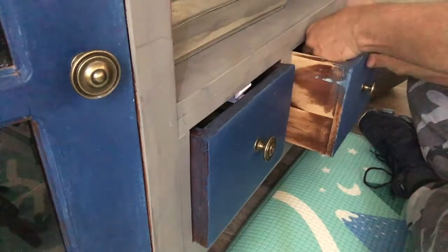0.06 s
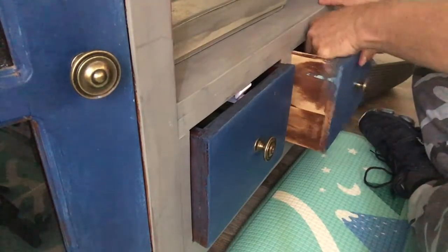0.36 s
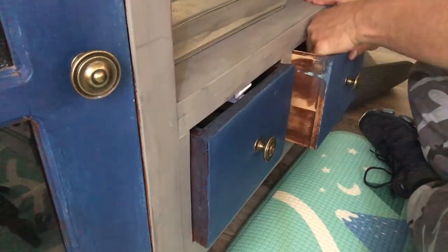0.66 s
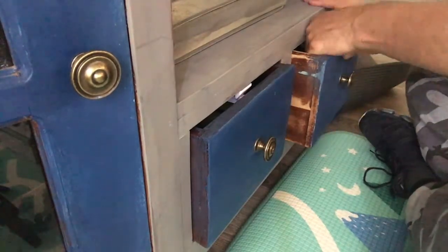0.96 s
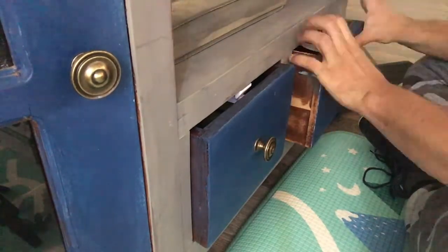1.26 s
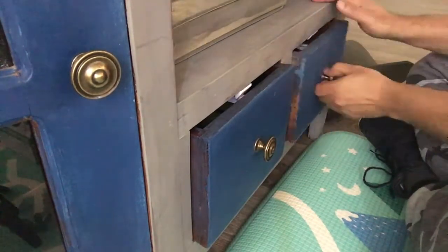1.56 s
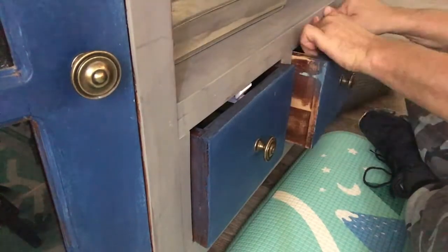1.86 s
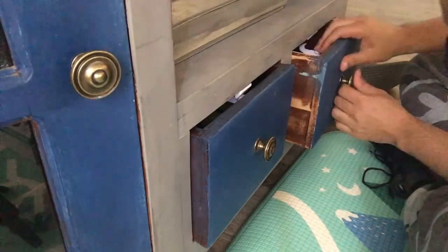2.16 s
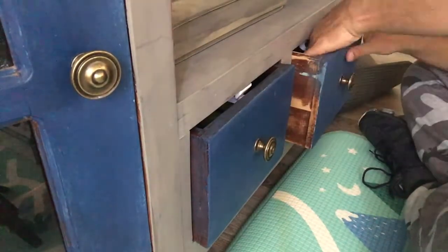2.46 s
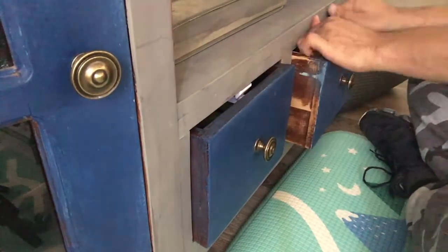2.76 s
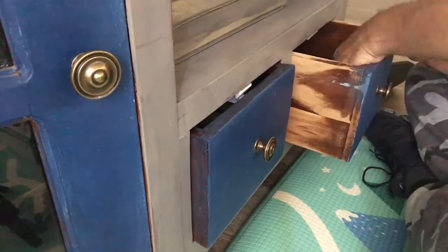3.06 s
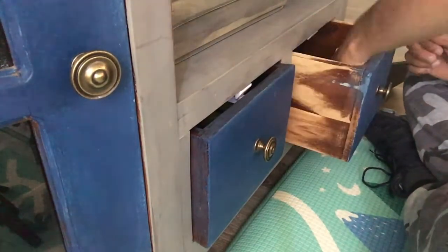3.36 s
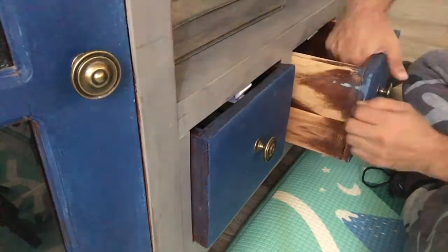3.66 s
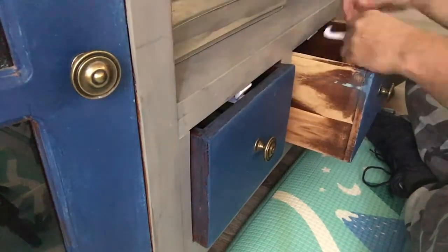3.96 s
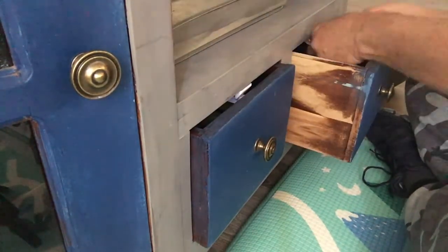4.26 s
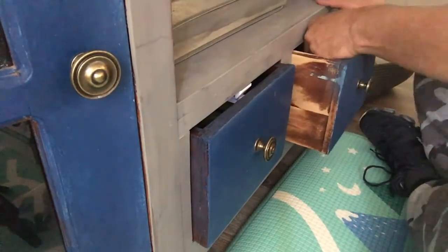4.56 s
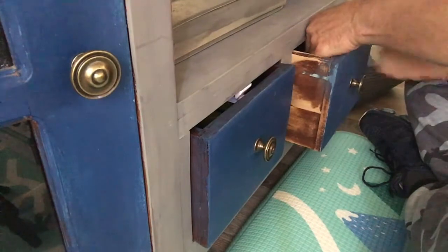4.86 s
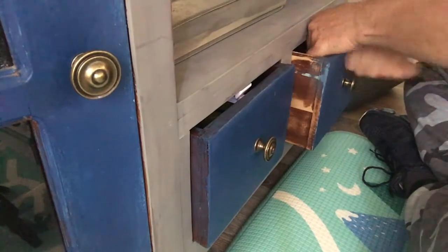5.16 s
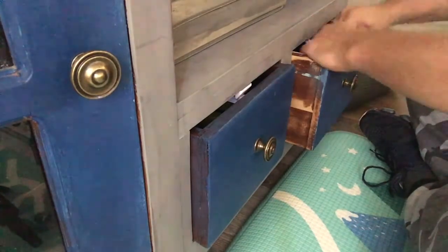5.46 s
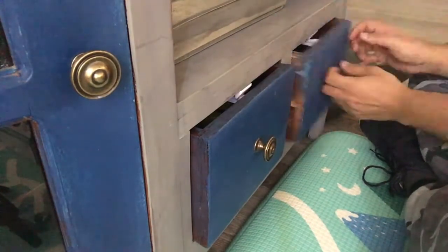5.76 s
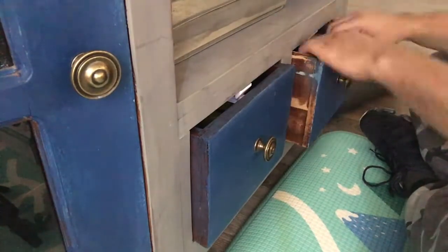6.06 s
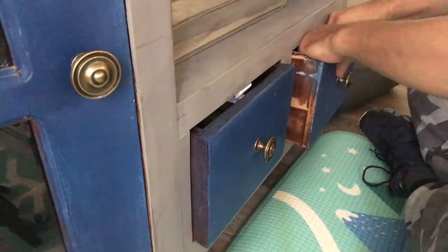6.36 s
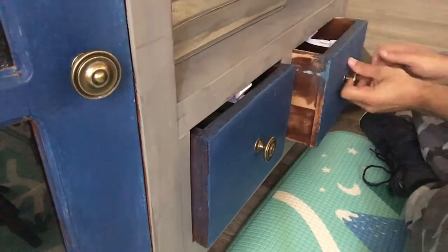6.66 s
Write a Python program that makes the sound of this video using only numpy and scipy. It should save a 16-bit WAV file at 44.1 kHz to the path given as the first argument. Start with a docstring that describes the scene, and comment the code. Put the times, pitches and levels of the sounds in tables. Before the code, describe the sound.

A small wooden drawer is worked by hand, close to the microphone in a quiet room. Sharp, uneven knocks against the cabinet fill the first second, with a soft hollow bump near 0.3 seconds. The loudest clack comes at 1.4 seconds, followed by more knocks until 1.9. A loose brass knob ticks lightly around 2.2 seconds, then a finger gives a tiny squeak and a nail hisses over the paint at 2.5. The drawer rattles briefly on its steel runner at 2.9, followed by soft finger taps and strong knocks at 3.5, 3.8 and 4.4. From 4.6 to 5.2 seconds it slides with a fast, ratcheting rattle, longest at the end. More knocks come between 5.6 and 6 seconds, then light finger rubs and a last knock at 6.7. A faint room hum and thin electrical buzz continue throughout.

```python
"""In a quiet room, a small wooden drawer is pulled out, rocked and pushed home by hand.
The box knocks in its cabinet, shaking its wooden panels, and rattles as its steel runner is dragged
over a row of catches. Fingers rub, tap and squeak on the paint, nails skate over it with a hiss, and
the loose brass knob ticks on its screw. Behind it are a faint room hum and a thin electrical buzz."""
import sys
import numpy as np
from scipy import signal
from scipy.fft import rfft, irfft, next_fast_len
from scipy.io import wavfile

SR = 44100
rng = np.random.default_rng(int(sys.argv[2]) if len(sys.argv) > 2 else 0)


def waveform_to_disk(signal):
    """Save audio, clipped to [-1, 1], as 16-bit WAV at the path in sys.argv[1]."""
    frames = np.transpose(np.atleast_2d(signal))
    scaled = np.clip(frames, -1, 1) * 32767
    samples = np.round(scaled).astype(np.int16)
    wavfile.write(sys.argv[1], SR, samples)


N = 299880
EVENT_TIME = np.arange(8192) / SR  # seconds since the start of one short sound

# the loose knob ticks on its screw: (time [s], level [dB])
KNOB_TICKS = [(.189, -54), (1.096, -56), (2.193, -47), (2.2173, -46.5), (2.2532, -44.5), (2.287, -53.5),
              (2.475, -54.5), (3.102, -52), (3.268, -52)]
# the knob's ringing notes: (pitch [Hz], level [dB], time to fade by 60 dB [s])
KNOB_NOTES = [(2552, -1, 0.0396), (3806, -13.5, 0.034), (4244, -6.5, 0.033), (4686, 5, 0.0315),
              (5140, -39, 0.02), (10760, -12, .01), (13350, -7, .009)]
# a fingernail skates over the paint: (time [s], length [s], level [dB])
NAIL_SKATES = [(0.215, 0.01013, -41.5), (2.547, 0.084, -50.5), (3.237, 0.088, -66), (3.395, 0.088, -58)]
# fingers slide over the wood: (time [s], length [s], level [dB])
FINGER_RUBS = [(0.465, 0.043, -55.5), (1.729, 0.182, -56), (1.897, 0.065, -57), (2.107, 0.083, -54),
               (2.719, 0.1, -57), (3.615, 0.0816, -53), (5.378, 0.025, -56), (5.51, 0.0667, -51.5),
               (5.981, 0.0637, -50), (6.038, 0.0446, -48.5), (6.115, 0.0386, -53.5), (6.234, 0.051, -61.5),
               (6.535, 0.0382, -49)]


def amp(db):
    """Turns decibels into a number to multiply a sound by."""
    return 10 ** (np.asarray(db) / 20)


def evened(x):
    """Scales a sound so that its average strength (rms) is 1."""
    return x / np.sqrt(np.mean(x ** 2) + 1e-20)


def struck(x):
    """Scales a blow so that its first 12 ms have an average strength of 1."""
    return x / np.sqrt(np.mean(x[:530] ** 2) + 1e-20)


def read(points, hz):
    """Reads between (frequency [Hz], value) points, treating every octave as equally wide."""
    point_hz, value = np.transpose(points)
    return np.interp(np.log(hz + 1), np.log(point_hz + 1), value)


def curve(points):
    """Turns (frequency [Hz], level [dB]) points into a gain for every frequency."""
    return lambda hz: amp(read(points, hz))


def colour(x, gain):
    """Turns each frequency in a sound up or down by gain(hz)."""
    size = next_fast_len(x.shape[-1] + 1024)
    return irfft(rfft(x, size) * gain(np.fft.rfftfreq(size, 1 / SR)), size)[..., :x.shape[-1]]


def bands(x, centres):
    """Splits a sound into overlapping frequency bands that add back up to it."""
    return [colour(x, lambda hz: read(np.c_[centres, pick], hz)) for pick in np.eye(len(centres))]


def add(mix, start_s, sound):
    """Mixes a sound in at the given time."""
    part = mix[max(round(start_s * SR), 0):][:len(sound)]
    part += sound[:len(part)]


def room_hum():
    """Still air hisses under a few softly wavering tones and a drifting whine."""
    # the hiss of the air: (frequency [Hz], relative level [dB])
    air_colour = [(60, -29), (170, 4.5), (280, -2), (420, 1.5), (620, 0.5), (950, 0), (1250, -6),
                  (2600, -2.5), (4300, -7), (7000, -11), (11000, -15), (16000, -16.5)]
    # the tones of the hum: (multiple of its pitch, level [dB])
    overtones = [(1, -75), (2, -76.5), (8, -86), (10, -78.5)]
    # the path of the whine: (time [s], pitch [Hz], level [dB])
    whine_path = [(0, 470, -63), (0.62, 468, -68), (1.548, 542, -67.5), (2.3, 500, -101), (3.1, 476, -68.5),
                  (3.6, 476, -67), (4.2, 485, -80.5), (5.401, 491, -68.5), (6.8, 462, -70)]
    air_db, hum_hz, thin_tone_hz, thin_tone_db = -64, 395.7, 2426, -73
    t = np.arange(N) / SR
    out = amp(air_db) * evened(colour(rng.standard_normal(N), curve(air_colour)))
    times, pitch, level = np.transpose(whine_path)
    whine = (np.interp(t, times, pitch), np.interp(t, times, level))
    hum = [(multiple * hum_hz, db) for multiple, db in overtones]
    for hz, db in hum + [(thin_tone_hz, thin_tone_db), whine]:
        drift = evened(colour(rng.standard_normal(N), lambda f: np.exp(-f / 8)))  # slow wobble
        phase = 2 * np.pi * np.cumsum(hz * (1 + .003 * drift)) / SR
        out += amp(db) * evened(np.sin(phase))
    return out


def electrical_buzz(rate_hz=240.15, level_db=-68, puff_db=-2):
    """Four slightly unsteady ticks in each cycle of the mains power, each with a puff of hiss."""
    turns = np.arange(N) / SR * rate_hz
    starts = np.arange(int(turns[-1])) / rate_hz
    late_s = rng.uniform(0, .0004, len(starts))
    ticks = np.bincount(np.round((starts + late_s) * SR).astype(int), minlength=N)[:N]
    puffs = rng.standard_normal(N) * np.exp(-(turns % 1) / .15)
    # only a thin fizz is heard: (frequency [Hz], relative level [dB])
    fizz = [(1000, -57), (4300, -25), (5000, 3), (5700, 2),
            (7000, -5), (8200, -1), (9500, -1), (10500, -25)]
    buzz = evened(ticks) + amp(puff_db) * evened(puffs)
    return amp(level_db) * evened(colour(buzz, curve(fizz)))


def ring(notes, detune_share=0.01162):
    """A struck object rings with fading notes; each point of contact favours them differently."""
    hz, db, fade_s = np.transpose(notes)[:, :, None]
    luck = rng.standard_normal((len(notes), 2, 1))
    favour_db, detune = 3.5 * luck[:, 0], 1 + detune_share * luck[:, 1]
    sign = (-1) ** np.arange(len(notes))[:, None]  # every other note swings the opposite way first
    fade = amp(db + favour_db - 60 * EVENT_TIME / fade_s)
    return (sign * fade * np.sin(2 * np.pi * hz * detune * EVENT_TIME)).sum(0)


def box_shakes(count, alike_share=0.281, cabinet_db=-17, cabinet_fade_s=0.0793, crack_db=15):
    """One short, noisy shudder of the box per blow, taking partly the same path through the wood."""
    # how the wood shakes: (frequency [Hz], level [dB], time to fade by 60 dB [s], rise time [s])
    wood_bands = [(294.4, -26, 0.06, 0.0055), (435.2, -5, 0.098, 0.00086), (950, 1, 0.0621, 0.000534),
                  (1500, 3.5, 0.0447, 0.00071), (2610, 8.5, 0.01903, 0.001774),
                  (4020, 1.5, 0.0352, 0.00048), (4539, 6.5, 0.0232, 0.000234),
                  (6027, -17.5, 0.0638, 0.000079), (9910, -5, 0.0231, 0.000357),
                  (16240, -5, 0.01262, 0.0000286)]
    same_path = np.sqrt(alike_share) * rng.standard_normal(len(EVENT_TIME))
    own_path = np.sqrt(1 - alike_share) * rng.standard_normal((count, len(EVENT_TIME)))
    crack = amp(crack_db) * signal.unit_impulse(len(EVENT_TIME), idx=11)  # the contact arrives first
    parts = bands(same_path + own_path + crack, [row[0] for row in wood_bands])
    cabinet = amp(cabinet_db - 60 * EVENT_TIME / cabinet_fade_s)  # it holds the sound a little longer
    out = 0
    for part, (_, db, fade_s, rise_s) in zip(parts, wood_bands):
        fade = np.hypot(amp(-60 * EVENT_TIME / fade_s), cabinet)
        out = out + part * amp(db) * fade * (1 - np.exp(-EVENT_TIME / rise_s))
    return out


def blows(hits, panels_db, steel_db, brightening):
    """Plays a list of hits: heavy ones thud in the panels; hard, small ones snap in the treble."""
    # the wooden panels' notes: (pitch [Hz], level [dB], time to fade by 60 dB [s])
    panel_notes = [(442.9, -10.5, 0.0785), (565.7, -2.5, 0.0578), (764, -10, 0.0285), (875.1, 6.5, 0.0598),
                   (941.5, 2.5, 0.0244), (982.7, -3, 0.09), (1365.6, -6.5, 0.0956), (1653.5, -7, 0.0966),
                   (1756.6, -17.5, 0.092), (1923.5, 3, 0.0045), (2059, -25.5, 0.045), (2542, 5, 0.0315),
                   (3192, 0.5, 0.0435), (3394, -12, 0.058), (3743, 5.5, 0.0154), (4447, 3.5, 0.0085),
                   (4611, 6.5, 0.0153)]
    # the steel runner's notes: (pitch [Hz], level [dB], time to fade by 60 dB [s])
    steel_notes = [(4632, -6.5, 0.0343), (5002, 8, 0.0115), (5293, -5.5, 0.0162), (12070, -33, .17),
                   (12280, -33, .16)]
    out = np.zeros(N)
    for (start, db, thud_db, snap_db), box in zip(hits, box_shakes(len(hits))):
        hardness = snap_db - thud_db / 2  # a heavy blow stays in contact longer
        panels = amp(panels_db - 0.123 * hardness) * struck(ring(panel_notes))  # soft hits ring more
        wood = struck(box) + panels
        thud = colour(wood, lambda hz: 1 / (1 + (hz / 1200) ** 8))
        snap = colour(wood, lambda hz: 1 - 1 / (1 + (hz / 6200) ** 20))
        middle = wood - thud - snap
        db_per_octave = brightening * hardness
        clack = colour(middle, lambda hz: amp(db_per_octave * np.log2(np.clip(hz, 2000, 7000) / 2000)))
        knock = struck(clack) + amp(thud_db) * struck(thud) + amp(snap_db) * struck(snap)
        steel = amp(steel_db) * ring(steel_notes, detune_share=0)
        add(out, start, amp(db) * (knock + steel))
    return out


def frame_knocks():
    """Lists the hits of the drawer against its frame."""
    # each knock: (time [s], level [dB], thud relative to level [dB], snap relative to level [dB])
    knocks = [(0.0045, -34, -4, -7.5), (0.0358, -32, -4.5, 0), (0.0498, -32.5, -7.5, -10),
              (0.1168, -32, -12.5, -3.5), (0.2297, -30.5, -9, -2), (0.4107, -32, -5, -2),
              (0.5056, -28.5, -14, -2), (0.946, -28, -11, -0.5), (1.0112, -32, -4.5, -4),
              (1.4074, -29.5, -5, -2), (1.4216, -18.5, -17, -10.5), (1.4275, -25, -5, -6),
              (1.475, -34.5, -7, -15), (1.605, -36.5, -4.5, -12), (1.6157, -32.5, -18.5, -21),
              (1.6617, -43, -7.5, -6.5), (1.7855, -30.5, -7, -9.5), (1.819, -37, -3.5, -4),
              (1.8421, -34, -11, -0.5), (1.8731, -28.5, -8.5, -2), (1.9269, -52.5, -2.5, 0),
              (2.9456, -30.5, -8, -14), (3.494, -31.5, -7, -1.5), (3.7682, -36.5, -7.5, -6),
              (3.7893, -32, 1, 3.5), (3.7925, -23, -15, -20.5), (3.8101, -29, -4.5, -3.5),
              (4.0907, -56.5, -13.5, 10), (4.4057, -29, -11.5, -2.5), (4.4203, -32, -18.5, -11),
              (4.428, -34.5, -8, -5.5), (5.6099, -27.5, -14, -3), (5.6262, -37.5, -4.5, -13),
              (5.6416, -38, -9.5, -8), (5.65, -38.5, 3.5, -8.5), (5.7844, -44, -17, -9.5),
              (5.7944, -44.5, -15, 0.5), (5.8053, -38, -3, -13.5), (5.8136, -36, -14, -14),
              (5.9184, -37.5, -7.5, -7), (5.9605, -31.5, -10.5, 0.5), (6.6978, -28, -9, -4)]
    return knocks


def light_touches(touches, notes, grit_db):
    """Each light touch rings a few notes, with some grit from the contact."""
    out = np.zeros(N)
    for (start, db), box in zip(touches, box_shakes(len(touches))):
        add(out, start, amp(db) * (struck(ring(notes)) + amp(grit_db) * struck(box)))
    return out


def knob_ticks():
    """The loose brass knob hits its screw and rings briefly."""
    return light_touches(KNOB_TICKS, KNOB_NOTES, grit_db=-5)


def through_wood(x, treble_db=-9):
    """The wood passes little of a soft touch above 5 kHz."""
    return colour(x, lambda hz: amp(np.interp(hz, [5200, 6200], [0, treble_db])))


def fidgets(count=70, softest_db=-66, knob_db=-8):
    """The grip keeps shifting around each stroke, making tiny soft ticks of box and knob."""
    out = np.zeros(N)
    strokes = [row[0] for row in FINGER_RUBS + NAIL_SKATES + KNOB_TICKS]
    for (which, when, size), box in zip(rng.random((count, 3)), box_shakes(count)):
        start = strokes[int(which * len(strokes))] + .16 * (when - .25)
        tick = struck(box) + amp(knob_db) * struck(ring(KNOB_NOTES))
        add(out, start, amp(softest_db + 10 * size ** 2) * tick)
    return through_wood(out)


def slides(strokes, gain, snags_per_s=300, snag_s=.0012):
    """A sliding surface hisses and catches on tiny snags; each stroke swells quickly and fades."""
    out = np.zeros(N)
    for start, length, db in strokes:
        hiss, slips = rng.standard_normal((2, len(EVENT_TIME)))
        snags = np.abs(slips) ** 1.4 * (rng.random(len(EVENT_TIME)) < snags_per_s / SR)
        grip = .42 + signal.lfilter([1], [1, -np.exp(-1 / (snag_s * SR))], snags)  # each snag dies away
        progress = np.minimum(EVENT_TIME / length, 1)
        swell = np.sin(np.pi * progress ** .5)
        add(out, start, amp(db) * evened(colour(hiss * grip, gain)) * swell)
    return out


def nail_skates():
    """A fingernail skates over the paint with a narrow, high hiss."""
    # the nail's hiss: (frequency [Hz], relative level [dB])
    nail_colour = [(2500, -22.5), (3500, -16), (4150, -1), (4800, -9), (5600, -24.5), (11000, -26),
                   (13800, -16), (16000, -20.5)]
    return slides(NAIL_SKATES, curve(nail_colour))


def box_shuffles(centre_hz=399, width_octaves=0.584):
    """The box shifts in the grip with a low shuffle."""
    # each shift: (time [s], length [s], level [dB])
    shuffles = [(0.32, 0.0378, -52.5), (1.955, 0.07, -61), (4.19, 0.059, -65)]
    return slides(shuffles, lambda hz: np.exp(-.5 * (np.log2((hz + 1) / centre_hz) / width_octaves) ** 2))


def hand_bumps():
    """The heel of a hand bumps the box softly, and it gives a hollow ring."""
    # each bump: (time [s], level [dB])
    bumps = [(.3283, -43), (1.975, -63.5)]
    # the hollow box's notes: (pitch [Hz], level [dB], time to fade by 60 dB [s])
    hollow_notes = [(541.2, -7.5, 0.078), (779, -10, 0.028)]
    return light_touches(bumps, hollow_notes, grit_db=-16)


def finger_rubs():
    """Skin rubs over the painted wood and is heard through the box."""
    # the rubbing noise: (frequency [Hz], relative level [dB])
    rub_colour = [(300, -16.5), (600, -5), (900, 3.5), (1300, -3), (2000, 0.5), (3000, -0.5), (4700, -4),
                  (6200, -15), (11000, -13), (16000, -16)]
    return slides(FINGER_RUBS, curve(rub_colour))


def finger_taps(thud_db=-4, snap_db=-13.5):
    """Lists the hits of fingertips on the box; flesh is soft, so more thud and little snap."""
    # each tap: (time [s], level [dB])
    taps = [(0.8265, -54), (1.2565, -54.5), (1.3363, -49.5), (1.578, -51.5), (1.5912, -50.5), (2.1063, -48),
            (3.1534, -48.5), (3.2344, -49.5), (3.3342, -46), (3.407, -42.5), (3.7205, -47.5), (4.7249, -47),
            (5.5364, -52.5), (6.2213, -56), (6.6341, -46.5)]
    return [(start, db, thud_db, snap_db) for start, db in taps]


def finger_squeak(grit_db=-5):
    """Skin sticks and slips on the paint a few times very quickly, shaking the box."""
    # the squeak: (time [s], length [s], level [dB], slip rate [Hz])
    squeaks = [(2.5143, .006, -39, 1116)]
    # the notes each slip rings: (pitch [Hz], level [dB], time to fade by 60 dB [s])
    skin_notes = [(1142, -6.5, 0.0206), (2378, -4.5, 0.02), (3527, -6, .022), (4166, -2.5, 0.0112)]
    out = np.zeros(N)
    for (start, length, db, slip_hz), box in zip(squeaks, box_shakes(len(squeaks))):
        slips = np.diff(np.floor(EVENT_TIME * slip_hz), prepend=-1) * (EVENT_TIME < length)
        tone = signal.fftconvolve(slips, ring(skin_notes))[:len(EVENT_TIME)]
        add(out, start, amp(db) * (struck(tone) + amp(grit_db) * struck(through_wood(box))))
    return out


def runner_catches(swell_db_per_s=8.5, jitter_s=0.0005, spread_db=0.5):
    """Lists the hits of the runner on evenly spaced catches; longer pushes swell more in the middle."""
    # each push: (time [s], length [s], catch rate [Hz], level [dB],
    #             relative thud [dB], relative snap [dB], relative level of the last catch [dB])
    pushes = [(2.8468, 0.102, 34.5, -30.5, -9.5, -1.5, -17),
              (4.5833, 0.08714, 29.64, -33.5, -8.5, -3.5, -31), (4.7536, 0.033, 33.5, -32, -3, -4.5, -10),
              (4.8134, 0.4015, 30.2, -30, -4, -5, -11)]
    hits = []
    for start, length, rate, db, thud_db, snap_db, last_db in pushes:
        count = max(round(length * rate), 1)
        for k, (late, luck) in enumerate(rng.standard_normal((count, 2))):
            force_db = swell_db_per_s * length * np.sin(np.pi * (k + .5) / count) + spread_db * luck
            hits.append((start + k / rate + jitter_s * late, db + force_db, thud_db, snap_db))
        # the drawer comes to rest on a weak, dull catch: more thud, less snap
        hits.append((start + count / rate, db + last_db, thud_db + 8.5, snap_db - 6))
    return hits


def room_echo(x, echo_db=-17, rise_s=0.0135):
    """A small furnished room adds a weak wash of echoes, each band fading at its own speed."""
    # how long the room rings: (frequency [Hz], time to fade by 60 dB [s])
    room_fades = [(300, 0.443), (900, 0.121), (2500, 0.212), (6000, 0.346), (15000, 0.178)]
    t = np.arange(SR // 2) / SR
    parts = bands(rng.standard_normal(len(t)), [row[0] for row in room_fades])
    tail = sum(part * amp(-60 * t / fade_s) for part, (_, fade_s) in zip(parts, room_fades))
    tail *= 1 - np.exp(-t / rise_s)
    dull_tail = colour(tail / np.linalg.norm(tail), curve([(1500, -0.5), (4500, -15.5), (9000, -17.0)]))
    return x + amp(echo_db) * signal.fftconvolve(x, dull_tail)[:N]


def scene():
    """The drawer and the hands, close by in the room, over the hum and the buzz."""
    knocks = blows(frame_knocks() + finger_taps(), panels_db=-4, steel_db=-19.5, brightening=0.697)
    runner = blows(runner_catches(), panels_db=-5, steel_db=0.5, brightening=0.298)
    hands = (knob_ticks() + hand_bumps() + finger_rubs() + nail_skates()
             + box_shuffles() + fidgets() + finger_squeak())
    return (room_echo(knocks + runner + hands) + room_hum() + electrical_buzz())[None]


def record(dry, bass_hz=305, leak_db=-22, top_hz=16100):
    """A small microphone picks up little bass, and the very highest treble is cut off."""
    thin = signal.sosfilt(signal.butter(6, bass_hz, "high", fs=SR, output="sos"), dry)
    heard = thin + amp(leak_db) * dry
    treble_cut = signal.firwin(161, top_hz, window=("kaiser", 8), fs=SR)
    return signal.oaconvolve(heard, treble_cut[None], "same")


dry = scene()
out = record(dry)
waveform_to_disk(out)
```